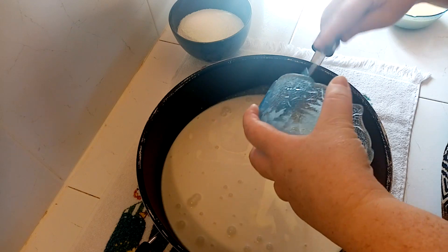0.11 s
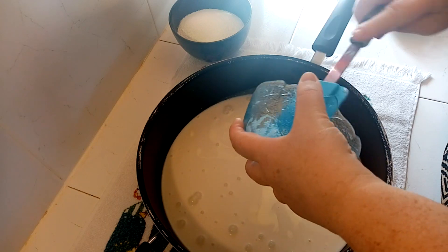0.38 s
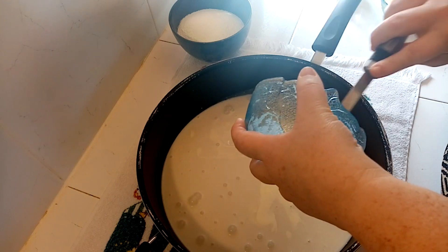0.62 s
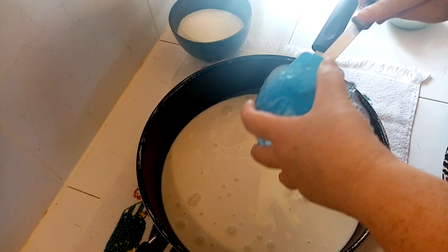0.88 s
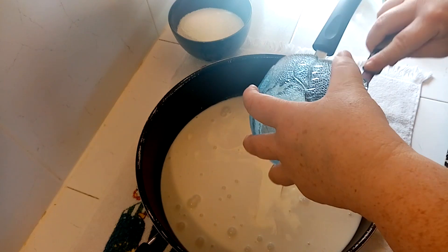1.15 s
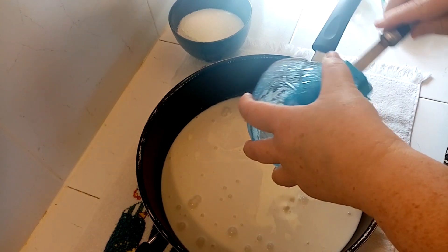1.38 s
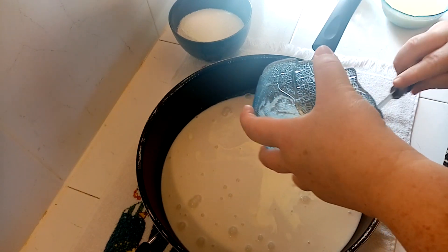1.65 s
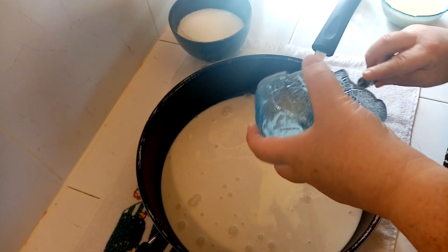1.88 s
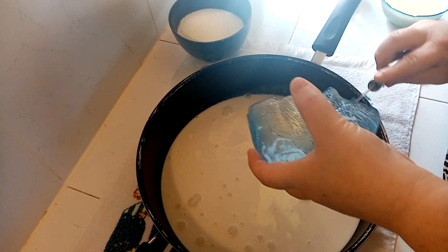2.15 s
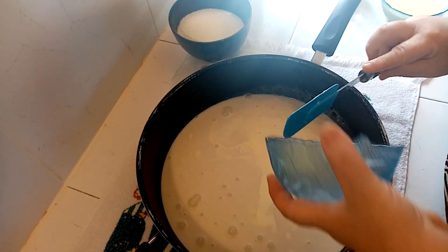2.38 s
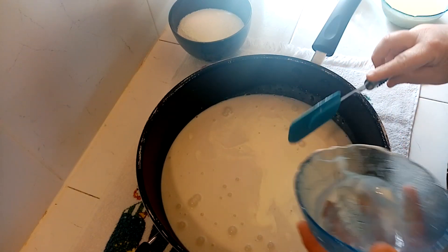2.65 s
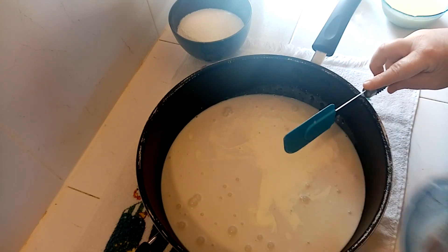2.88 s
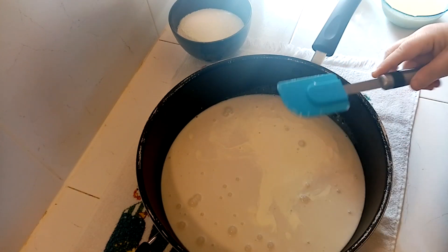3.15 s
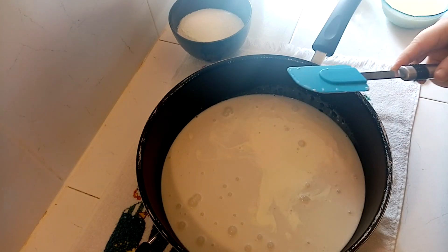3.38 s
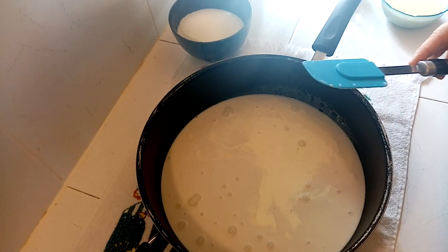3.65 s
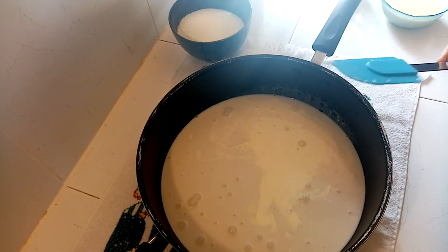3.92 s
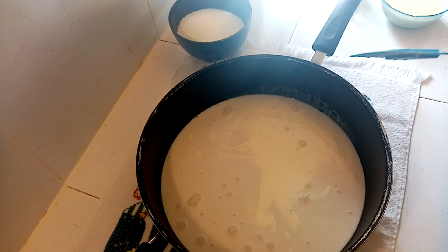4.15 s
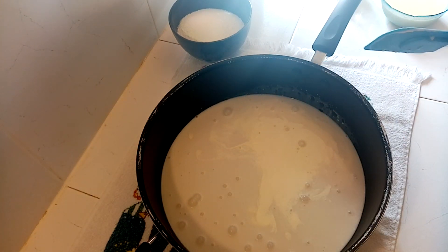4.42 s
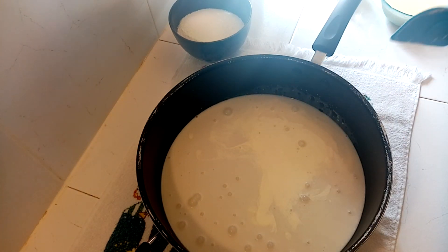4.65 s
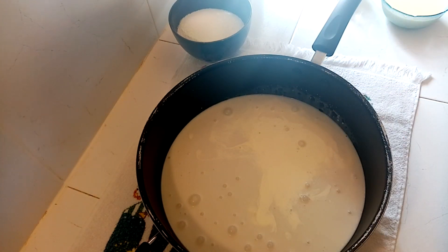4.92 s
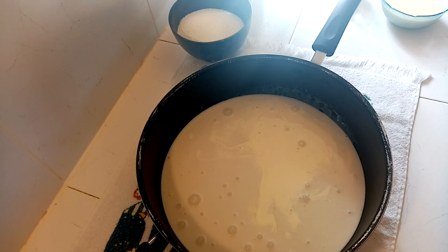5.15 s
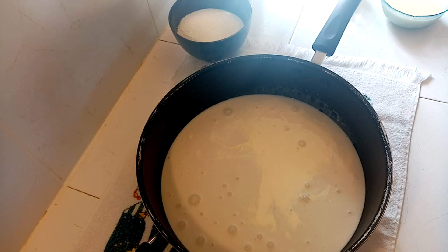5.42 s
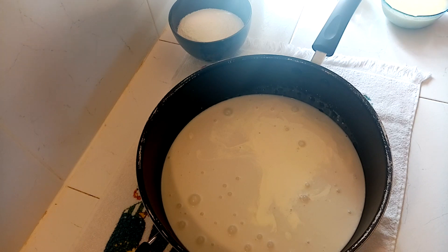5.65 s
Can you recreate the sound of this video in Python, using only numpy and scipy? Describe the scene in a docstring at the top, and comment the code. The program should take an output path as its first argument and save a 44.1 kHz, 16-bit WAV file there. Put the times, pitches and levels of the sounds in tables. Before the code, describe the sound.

A quiet, hard-surfaced kitchen heard close in stereo, with a low wavering machine hum and soft broadband rush throughout. From about 0.4 s, a distant drum gives a soft dull thump every 0.7 s; faint short rubbery squeaks come now and then, the clearest near 3.6 s. From 0.1 to 2.2 s a wet spatula in a glass bowl makes sparse, crisp ticks and tiny pops, strongest near 0.3, 1.5 and 1.9 s, with light sleeve rustle. At 2.7 s the thick glass bowl hits the counter with a hard, briefly ringing clack, and again at 2.84 s with a quick bounce. Low weight-shift rumble swells near 2.9 s. At 3.9 s the spatula lands in dull knocks, then rattles more densely and grittily from 4.14 to 4.3 s, with the loudest hand-and-cloth rustle, and two last soft taps at 4.4 s. Afterwards only hum, thumps, weak squeaks and slight rustling remain until 6 s.

```python
"""A machine hums in noise-fed resonances over a broad rush, while sleeves and hands rustle as noise swells.
Throughout, it squeaks now and then in decaying tones and thumps once a stroke in damped modes and noise.
Early on a spatula ticks wetly in a glass bowl as short pops and noise puffs; then the bowl meets the
kitchen counter in two knocks of modes and noise, and the spatula is laid down with a rattle of counter
modes under gritty noise. Echoes and a short tail add hard tiles; the right microphone hears it later."""
import sys
import numpy as np
from scipy import signal
from scipy.fft import rfft, irfft, next_fast_len
from scipy.io import wavfile
from scipy.ndimage import uniform_filter1d

SR = 44100
rng = np.random.default_rng(int(sys.argv[2]) if len(sys.argv) > 2 else 0)


def ratio_of_db(decibels):
    """Turn decibels (scalar or array-like) into linear amplitude factors; 0 dB maps to 1."""
    return 10 ** (np.asarray(decibels, float) / 20)


def log_audio(samples):
    """Write samples as a 16-bit WAV file to the path given in sys.argv[1]."""
    # one column per channel
    frames = np.atleast_2d(samples).T
    # limit to full scale, then quantise
    limited = np.clip(frames, -1, 1)
    pcm = np.round(limited * 32767).astype(np.int16)
    wavfile.write(sys.argv[1], SR, pcm)


N = 255446  # samples
AFTER = np.arange(16384) / SR  # time after a contact, s
RIGHT_LAG = 31  # delay of the right microphone, samples

# resonances of the counter top: f/Hz, relative level/dB, t60/s
COUNTER_MODES = [(60.6, 5, 0.053), (110.6, 5.5, 0.17), (184.2, 5.5, 0.24), (251, 13, 0.099),
                 (315.6, 3.5, 0.26), (357, 0, 0.34), (405, -0.5, 0.22), (446.7, 4, 0.18),
                 (545, 14.5, 0.036), (633, 12.5, 0.2), (747, 15, 0.072), (868, -4, 0.13)]


def at(table, hz):
    """Piecewise-linear interpolation of (f/Hz, value) points over log frequency."""
    f, v = np.transpose(table)
    return np.interp(np.log(np.maximum(hz, 1)), np.log(f), v)


def shape(x, db_of):
    """Zero-phase filtering: the spectrum is multiplied by a gain in dB given over frequency."""
    n = next_fast_len(x.shape[-1], True)
    hz = np.arange(n // 2 + 1) * SR / n
    return irfft(rfft(x, n) * ratio_of_db(db_of(hz)), n)[..., :x.shape[-1]]


def unit(x):
    """Normalisation to an rms of 1."""
    return x / np.sqrt(np.mean(x ** 2))


def peak(x, db):
    """Normalisation to a peak level in dB."""
    return x * ratio_of_db(db) / np.abs(x).max()


def walk(rate):
    """Slow random modulation: levels held for 1 / rate s, smoothed by two moving averages."""
    k = int(SR / rate)
    held = np.repeat(rng.standard_normal(N // k + 1), k)
    return unit(uniform_filter1d(uniform_filter1d(held, k), k)[:N])


def bumps(rows):
    """Energy addition of Gaussian swells, each (middle s, half width s at 1/e power, level dB)."""
    t = np.arange(N) / SR
    return np.sqrt(sum(ratio_of_db(2 * db) * np.exp(-((t - s) / half) ** 2) for s, half, db in rows))


def fade(t60, rise):
    """Exponential build-up at contact, then exponential decay by 60 dB in t60 seconds."""
    onset = 1 - np.exp(-AFTER / max(rise, 1e-4))
    return onset * np.exp(-np.log(1000) * AFTER / max(t60, 2e-3))


def ring(modes, rise, near_hz=None, reach=1, damping=1):
    """Modal superposition of decaying sines; near_hz favours modes within reach octaves."""
    out = 0
    for k, (hz, db, t60) in enumerate(modes):
        away = 0 if near_hz is None else np.log2(hz / near_hz) / reach
        sign = (-1) ** k  # neighbouring modes start in opposite directions
        level = ratio_of_db(db - 10 * min(away ** 2, 2.2))
        out = out + sign * level * fade(t60 / damping, rise) * np.sin(2 * np.pi * hz * AFTER)
    return out


def burst(db_of, t60, rise):
    """Broadband impact radiation: coloured noise under a decaying envelope."""
    return shape(rng.standard_normal(len(AFTER)), db_of) * fade(t60, rise)


def add(bus, s, sound, pan_db):
    """Time and level differences between microphones: the right hears the sound later."""
    for ch, lag, db in ((0, 0, pan_db / 2), (1, RIGHT_LAG, -pan_db / 2)):
        i = int(s * SR) + lag
        bus[ch, i:i + len(sound)] += ratio_of_db(db) * sound[:max(N - i, 0)]


def pair(db_of, alike_hz):
    """Spatial coherence of a diffuse field: shared and delayed in the bass, unrelated in the treble."""
    common, left, right = rng.standard_normal((3, N))
    shared = shape(common, lambda f: -10 * np.log10(1 + (f / alike_hz) ** 2))
    rest = lambda f: -10 * np.log10(1 + (alike_hz / np.maximum(f, 1)) ** 2)
    both = [shared + shape(left, rest), np.roll(shared, RIGHT_LAG) + shape(right, rest)]
    return shape(np.array(both), db_of)


def machine_hum(lumps_db):
    """Resonant filtering: noise in narrow bands whose levels waver, the lowest with the given lumps."""
    # hum resonances: f/Hz, width at -6 dB/Hz, level before the width correction/dB
    resonances = [(99.5, 14.8, -3.5), (483, 38, -3), (870.3, 43, -7), (2320, 164, -12), (2566, 150, -16),
                  (2800, 390, -20.5), (6800, 30, -23.5)]
    hum = 0
    for hz, width, db in resonances:
        bell = lambda f: -20 * np.log10(1 + (2 * (f - hz) / width) ** 2)
        waver_db = lumps_db if hz < 200 else 2.4 * walk(5.03)
        width_db = 4.7 * np.log10(width / 30)
        hum = hum + ratio_of_db(db + waver_db + width_db) * unit(pair(bell, 990.0))
    return ratio_of_db(-67) * hum


def rush(lumps_db):
    """Amplitude modulation of broadband noise: the bass moves in lumps, the rest flickers faster."""
    # spectrum of the rush: f/Hz, relative density level/dB
    rush_colour = [(15, -56), (25, -49), (92, -8), (127, -14), (180, -10), (229, -22.5), (317, -10.5),
                   (476, -11), (714, -23), (863, -15.5), (1290, -28.5), (2350, -17.5), (3500, -24),
                   (5000, -16.5), (6740, -22.5), (16000, -56.5)]
    steady = ratio_of_db(-69) * unit(pair(lambda f: at(rush_colour, f), 540.0))
    bass = shape(steady, lambda f: -10 * np.log10(1 + (f / 250) ** 6))
    return ratio_of_db(lumps_db) * bass + ratio_of_db(0.9 * walk(16)) * (steady - bass)


def background():
    """Common modulation: one slow random level moves the lowest hum and the bass of the rush."""
    lumps_db = 1.9 * walk(8.7)
    return machine_hum(lumps_db) + rush(lumps_db)


def rustling():
    """Friction noise: sleeves and hands brush past as flickering noise in Gaussian swells."""
    # passing strokes of cloth and skin: middle t/s, half width/s, level/dB
    passes = [(.1, 0.21, -67.5), (1.25, 0.42, -72.5), (1.8, 0.22, -70.5), (2.7, 0.22, -68),
              (3.1, 0.096, -64), (3.5, 0.79, -68.5), (3.86, .02, -63), (4.05, 0.049, -71),
              (4.13, 0.078, -55.5), (4.3, 0.13, -59), (4.62, .06, -65.5), (5.12, .045, -65.5)]
    # spectrum of the rustle: f/Hz, relative density level/dB
    rustle_colour = [(150, -2), (400, -3.5), (1200, -9), (3000, -4), (6500, -4), (9500, -14.5),
                     (13000, -33), (16000, -27)]
    noise = unit(pair(lambda f: at(rustle_colour, f), 500.0))
    return bumps(passes) * ratio_of_db(1.5 * walk(25.32)) * noise


def squeaks():
    """Phase modulation: a rubbery fundamental and octave share a random phase jitter, then decay."""
    # squeaks near the return stroke: t/s, peak level/dB, f/Hz
    calls = [(0.026, -74.5, 1343), (0.737, -69.5, 1356), (1.459, -66, 1980), (2.18, -71, 1935),
             (3.573, -61.5, 1768), (3.602, -66, 2065), (4.517, -77, 1240), (5.038, -82, 1383),
             (5.741, -69, 2100)]
    bus = np.zeros((2, N))
    for s, db, hz in calls:
        jitter = np.cumsum(rng.standard_normal(len(AFTER))) / np.sqrt(SR / 60)
        turns = hz * AFTER + 0.54 * jitter
        tone = np.sin(2 * np.pi * turns) + ratio_of_db(-12.5) * np.sin(4 * np.pi * turns)
        envelope = fade(160 / hz, 0.017)  # 60 dB decay over 160 cycles
        add(bus, s, peak(tone * envelope, db), 0)
    return bus


def ticks():
    """Sudden release: wet silicone snaps off glass with a few-cycle pop, a broad click and a short hiss."""
    # spatula edge on the bowl: t/s, level/dB, centre f/Hz, click peak level re the pop/dB
    snaps = [(0.072, -45, 6700, -37), (0.1558, -44, 3090, -1), (0.3086, -33.5, 6000, -24),
             (0.848, -58.5, 7600, -18), (1.029, -62, 9400, 12), (1.037, -42, 5550, -15),
             (1.053, -60, 10600, 3), (1.187, -54, 6200, -5), (1.4792, -38.5, 8000, -7),
             (1.936, -31, 6600, -13), (1.958, -50, 2260, -16), (1.9683, -40.5, 2470, -22),
             (1.996, -50, 1100, -24), (2.217, -68, 6840, 7), (2.611, -57.5, 9500, -3)]
    bus = np.zeros((2, N))
    for s, db, hz, click_db in snaps:
        pop_envelope = np.exp(-(AFTER * hz / 3.1 - 1.2) ** 2)  # 3.1 cycles set its width
        pop = pop_envelope * np.sin(2 * np.pi * hz * AFTER)

        def bell(f):
            octaves = np.log2(np.maximum(f, 1) / hz)
            floor_db = 30 + 12 * (f < hz / 2.5)
            return -np.minimum(12 * (octaves / 0.51) ** 2, floor_db)

        below = lambda f: -11 * np.maximum(np.log2(hz / np.maximum(f, 1)), 0)
        click = burst(below, 0.0044, 0.00028)
        hiss = burst(bell, 0.019, 0.0012)
        add(bus, s, ratio_of_db(db) * (pop + peak(click, click_db) + peak(hiss, -4)), 3)
    return bus


def bass_swells():
    """Low-frequency loading: the deep bass swells as weight shifts on the counter."""
    # shifts of weight: middle t/s, half width/s, level/dB
    shifts = [(.3, 0.072, -91.5), (2.1, 0.2, -72.5), (2.6, 0.16, -72), (2.9, 0.06, -56.5), (4.05, .1, -68),
              (4.47, 0.08, -67), (5.5, 0.19, -72)]
    # spectrum of the swells: f/Hz, relative density level/dB
    swell_colour = [(20, -20), (45, -10), (70, 2.5), (120, -1.5), (200, -11), (280, -12), (600, -87)]
    noise = unit(pair(lambda f: at(swell_colour, f), 470.0))
    return bumps(shifts) * ratio_of_db(1.8 * walk(9)) * noise


def machine_thumps():
    """Periodic impact: a distant drum reverses each stroke with soft noise, a catch and damped modes."""
    first_s, stroke_s = 0.3795, 0.7169
    # spectrum of the thump: f/Hz, relative density level/dB
    thump_colour = [(88, -45), (150, -60), (321, 6.5), (391, -22), (545, -15.5), (854, -12), (960, -20.5),
                    (1480, -21), (2600, -26), (6390, -25), (9440, -30), (12700, -48), (16000, -44)]
    # ringing of the drum: f/Hz, relative level/dB, t60/s
    drum_modes = [(221.2, -4, 0.16), (312.2, 6, 0.15)]
    # click that leads the drum ring: f/Hz, relative level/dB, t60/s
    catch_modes = [(1495, -2, .05), (2006, 0, .06)]
    bus = np.zeros((2, N))
    for s in np.arange(first_s, N / SR, stroke_s):
        thump = burst(lambda f: at(thump_colour, f), 0.31, 0.0027)
        add(bus, s, peak(thump, -50.5), 0)
        add(bus, s + 0.004, peak(ring(catch_modes, 0.001), -61), 0)
        add(bus, s + 0.015, peak(ring(drum_modes, 0.0046), -53.5), 0)
    return bus


def bowl():
    """Modal impact: thick hand-damped glass rings and clacks on the counter, which thuds."""
    # bowl meets the counter, each knock with a bounce: t/s, level/dB, extra low-ring level/dB
    blows = [(2.686, -19.5, 7), (2.700, -47, -11.5), (2.833, -29, 2), (2.8396, -19, 2.5), (2.853, -32.5, 4)]
    # resonances of the glass: f/Hz, relative level/dB, t60/s
    glass_modes = [(348.8, 3.5, 0.27), (552, -10.5, 0.22), (801, -3.5, 0.18), (961, -10.5, 0.17),
                   (1275, 1, 0.11), (1340, -1.5, 0.1), (1690, 2, 0.11), (2340, -5.5, 0.11),
                   (3345, -1, 0.12), (3900, -5, 0.082), (4460, -3.5, 0.091), (4823, 20, 0.024),
                   (5820, -4, 0.12), (6200, 0, 0.16), (6160, -15, 0.13), (6430, 5, 0.11), (6610, -5.5, .12),
                   (7600, -8, .09)]
    # spectrum of the clack: f/Hz, relative density level/dB
    clack_colour = [(290, -61), (500, -5.5), (1160, -8), (1360, -0.5), (2160, -17), (3250, -8.5),
                    (3980, -17.5), (6330, -0.5), (7100, -16.5), (8960, -19), (13400, -40.5), (14900, -38),
                    (16000, -81)]
    bus = np.zeros((2, N))
    for s, db, low_db in blows:
        # a flat landing wakes the low rings more than a blow on the rim
        woken = [(hz, v + low_db * (hz < 600), t60) for hz, v, t60 in glass_modes]
        glass = ratio_of_db(-23) * ring(woken, 0.0013)
        clack = burst(lambda f: at(clack_colour, f), 0.03, 0.0007)
        thud = peak(ring(COUNTER_MODES[:3], 0.002), -19)
        add(bus, s, ratio_of_db(db) * (glass + peak(clack, 3) + thud), 0.5)
    return bus


def spatula():
    """Local modal excitation: handle and blade land in turn, dull knocks under gritty contact noise."""
    # landings: t/s, knock peak level/dB, counter answer f/Hz, damping factor, clatter level re the knock/dB
    landings = [(3.878, -27, 600, 1.9, -6.5), (3.887, -35, 520, 0.67, -12), (3.902, -26, 520, 1.4, -5.5),
                (3.917, -33, 315, 1.2, 7), (3.935, -35.5, 830, 0.88, -16), (4.009, -34, 400, 3.2, -3),
                (4.039, -48, 450, 4.7, -23), (4.14, -42, 480, 0.94, -4), (4.172, -30.5, 480, 0.61, -10.5),
                (4.197, -27, 430, 2.5, -3.5), (4.207, -23.5, 405, 1.25, -11), (4.221, -35, 200, 1.45, 4),
                (4.238, -31.5, 300, 3.1, -5.5), (4.256, -32, 355, 1.7, 4.5), (4.264, -32.5, 355, 2.6, 3.5),
                (4.277, -31.5, 385, 2.2, -9), (4.291, -34.5, 860, 2.7, 0.5), (4.405, -37, 190, 3.1, -4.5),
                (4.411, -38, 330, 2.4, -27)]
    # spectrum of the clatter: f/Hz, relative density level/dB
    clatter_colour = [(530, -34), (900, 2.5), (1190, -8), (1490, -6), (2020, -3.5), (2790, -9),
                      (3230, -2.5), (6180, -2.5), (12300, -28.5), (15400, -29.5), (16000, -76)]
    bus = np.zeros((2, N))
    envelope = fade(0.036, 0.001)
    for s, db, hz, damping, clatter_db in landings:
        thud = peak(ring(COUNTER_MODES, 0.0017, hz, 0.26, damping), 0)
        # many tiny contacts of uneven size, each 32 samples long
        sizes_db = 3.5 * np.repeat(rng.exponential(size=len(AFTER) // 32), 32)
        grit = rng.standard_normal(len(AFTER)) * ratio_of_db(sizes_db)
        clatter = unit(shape(grit, lambda f: at(clatter_colour, f)) * envelope)
        clatter = clatter * np.sqrt(np.mean(envelope ** 2))
        add(bus, s, ratio_of_db(db) * (thud + ratio_of_db(clatter_db) * clatter), -0.3)
    return bus


def room(dry, wet_db):
    """Reverberation by convolution: hard early echoes and a dense tail unlike at each microphone."""
    # reverberation time: f/Hz, t60/s
    tail_t60 = [(100, 0.89), (500, 0.19), (2000, 0.23), (6000, 0.18), (14000, 0.46)]
    # tail spectrum: f/Hz, relative level/dB
    tail_colour = [(100, -13), (500, -9), (1500, 1.5), (6000, -2), (14000, -10)]
    # reflections from counter, pan and tiles: left delay t/s, level before the bass cut/dB
    reflections = [(.0022, -0.5), (.0048, -2), (.0075, -5), (.012, -10)]
    tail = 0
    for hz in 60 * 2.0 ** np.arange(9):  # octave bands
        noise = rng.standard_normal((2, len(AFTER)))
        band = shape(noise, lambda f: -24 * np.log2(np.maximum(f, 1) / hz) ** 2)
        decay = band * fade(at(tail_t60, hz), 0.00067)
        tail = tail + decay * np.sqrt(hz / np.sum(decay ** 2)) * ratio_of_db(at(tail_colour, hz))
    tail = ratio_of_db(wet_db) * tail / np.sqrt(np.sum(tail ** 2) / 2)
    early = np.zeros_like(tail)
    for k, (delay, db) in enumerate(reflections):
        arrivals = [int(delay * SR), int(delay * SR * 1.12)]  # left, right
        early[[0, 1], arrivals] = (-1) ** k * ratio_of_db(db)
    early = shape(early, lambda f: -10 * np.log10(1 + (1500 / np.maximum(f, 1)) ** 2))
    return dry + signal.fftconvolve(dry, tail + early, axes=1)[:, :N]


def scene():
    """Linear superposition: near knocks and far machine, each with its share of the room, over the beds."""
    far = room(squeaks() + machine_thumps(), 0.33)
    near = room(ticks() + bowl() + spatula(), -1.5)
    return background() + rustling() + bass_swells() + far + near


def top_cut(x):
    """Nothing passes above the cut-off."""
    return signal.sosfilt(signal.butter(12, 16480, fs=SR, output="sos"), x)


def record(dry):
    """Transducer response: the right favours treble; both lose the deepest bass and hiss faintly."""
    # sensitivity of the right microphone over the left: f/Hz, level/dB
    right_over_left = [(60, 0), (380, 7), (700, 4), (1400, 4), (2800, 3), (6000, 4), (9000, 11.5),
                       (12000, 13.5), (15000, 30.5)]
    left = shape(dry[0], lambda f: -0.5 * at(right_over_left, f))
    right = shape(dry[1], lambda f: 0.5 * at(right_over_left, f))
    bass_cut = signal.butter(2, 40, "high", fs=SR, output="sos")
    mics = signal.sosfilt(bass_cut, np.array([left, right]))
    # the hiss is centred on 15 kHz
    slope = lambda f: -30 * np.minimum(np.abs(np.log2(np.maximum(f, 1) / 15000) / 0.48), 2)
    hiss = shape(rng.standard_normal(dry.shape), slope)
    mix = mics + ratio_of_db(-93.5) * unit(hiss)
    return top_cut(mix)


dry = scene()
out = record(dry)
log_audio(out)
```